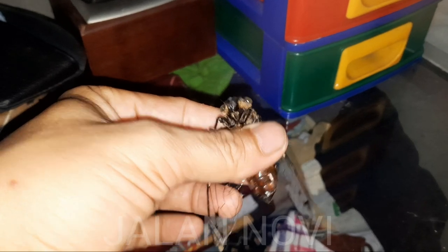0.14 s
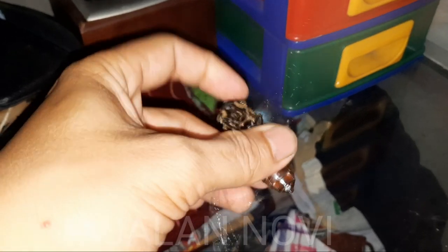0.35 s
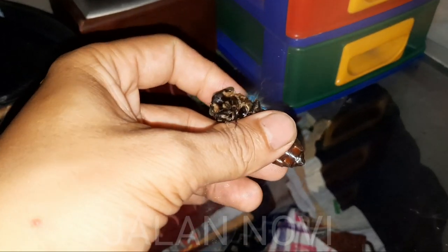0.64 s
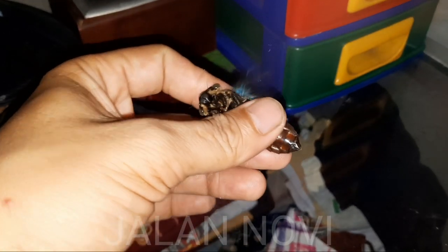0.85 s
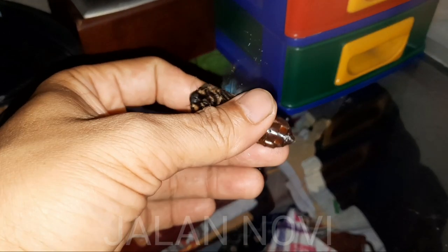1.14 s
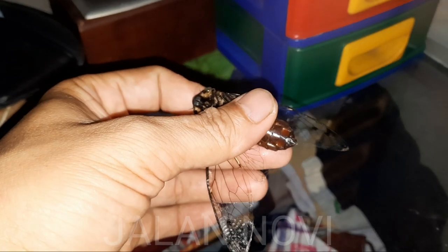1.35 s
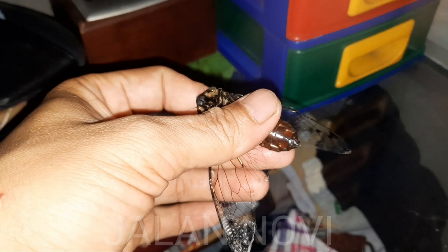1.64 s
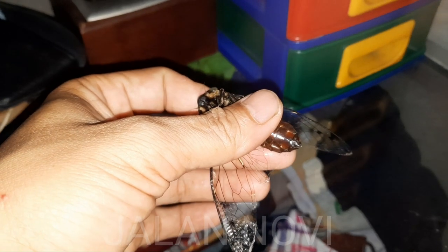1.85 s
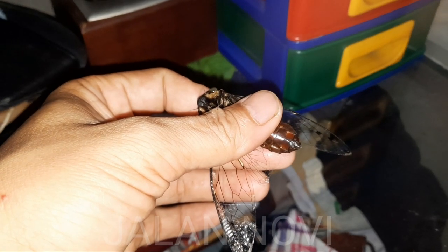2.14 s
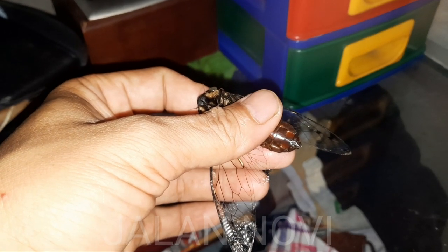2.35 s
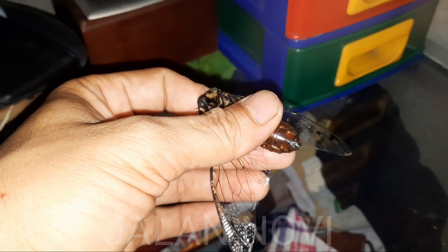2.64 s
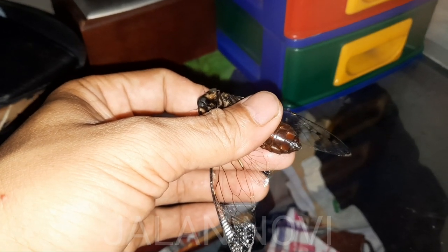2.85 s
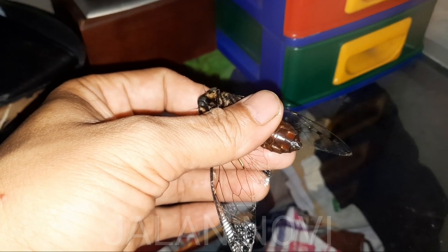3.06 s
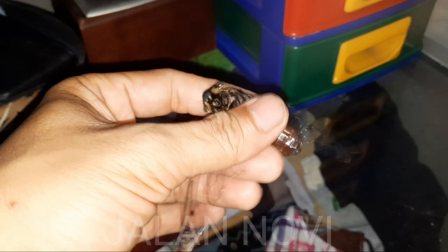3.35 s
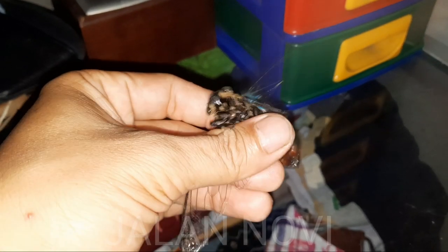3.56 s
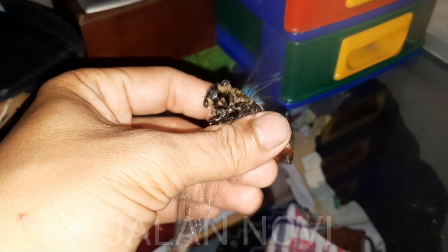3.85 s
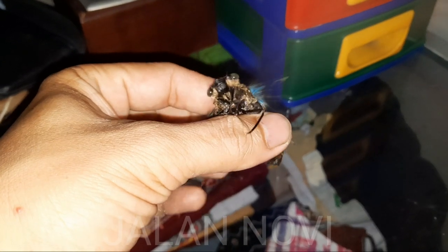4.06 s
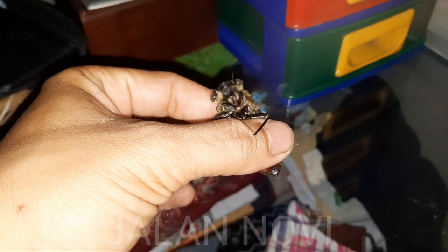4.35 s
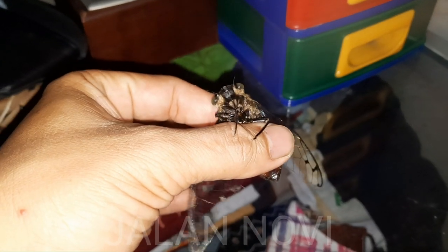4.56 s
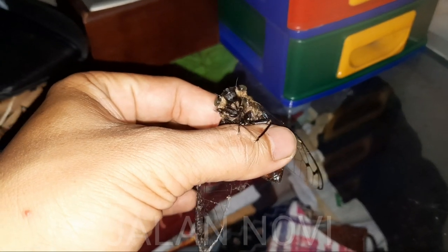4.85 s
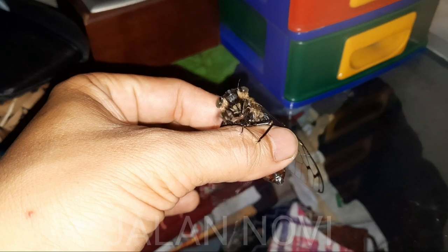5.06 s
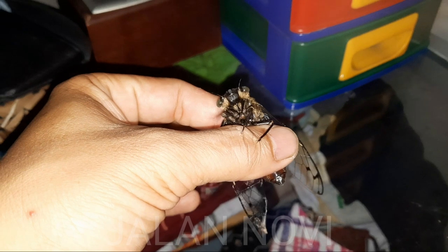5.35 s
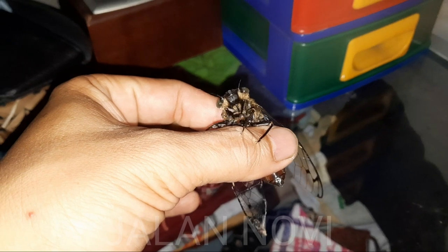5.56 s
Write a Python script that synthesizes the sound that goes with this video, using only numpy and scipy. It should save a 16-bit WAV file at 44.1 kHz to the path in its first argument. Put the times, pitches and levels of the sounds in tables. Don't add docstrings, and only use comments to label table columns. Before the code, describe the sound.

Very close, bright insect buzzing, a coarse rapid ratchet of about a hundred strokes a second, starts and stops abruptly in a small quiet room. One long burst and five quick ones precede a pause holding a short room tail, faint hum and distant insects. A loud second run follows with fluttering wings, dull finger taps and hand rumble, closing on two short-gapped bursts.

```python
import sys
import numpy as np
from scipy import signal
from scipy.fft import rfft, irfft, next_fast_len
from scipy.io import wavfile
from scipy.ndimage import uniform_filter1d

SR = 44100
rng = np.random.default_rng(int(sys.argv[2]) if len(sys.argv) > 2 else 0)


def file_out(sig):
    cols = np.atleast_2d(sig).T
    lim = np.clip(cols, -1, 1)
    pcm = np.round(lim * 32767).astype(np.int16)
    wavfile.write(sys.argv[1], SR, pcm)


def magnitude_from_level(level_db):
    exponent = np.asarray(level_db, float) / 20
    return 10 ** exponent


N = 250929

# start t/s, stop t/s, level at start/dB, level at stop/dB
BURSTS = [
    (0, 1.319, -13, -16.5),
    (1.339, 1.493, -15, -15),
    (1.517, 1.678, -14.5, -15.5),
    (1.713, 1.816, -15, -13.5),
    (1.831, 1.924, -16, -13),
    (2.066, 2.257, -15.5, -13.5),
    (3.308, 4.517, -10, -16),
    (4.546, 4.765, -15, -15.5),
    (4.929, 5.531, -13.5, -13.5),
    (5.562, 5.74, -13, -13.5),
]
# t/s, strokes per s
STROKES = [(0, 107.3), (.45, 108), (1.2, 107.2), (1.45, 108), (1.75, 109), (2.2, 109.8), (3.32, 108.8),
           (3.62, 107.8), (4.15, 109.4), (4.5, 109.2), (4.68, 111.5), (5.06, 111.4), (5.5, 110.2),
           (5.69, 111)]
# place in the stroke (0-1), strength/dB
RIBS = [(.02, 0), (.265, -1), (.52, -2), (.77, -1.5)]
# t/s, length of the turn/s
TURNS = [
    (.3, 0.057),
    (0.519, 0.2),
    (2.8, .1),
    (4.082, 0.24),
    (4.85, .1),
]
# t/s, depth/dB, half length/s
FALTERS = [
    (0.082, 9.5, 0.0089),
    (0.355, 4.5, 0.12),
    (4.344, 10.5, 0.015),
]
START_DB, START_S = 12, 0.0038
SWELL_DB, SWELL_S, REST_POWER = 14.5, 0.032, 0.55
STOP_DB, STOP_S = 3, 0.0098
PICK_UP, PICK_UP_S = .07, .035
TIRE, TIRE_S = .045, .025
PAIRED = .7
WEAK_RIB_DB = 7

# f/Hz, width/Hz, level/dB
BELLY_LOW = [(1720, 160, 3), (2150, 140, 3), (2540, 130, 5), (3130, 150, 3), (4250, 200, 3), (9400, 300, 3)]
# f/Hz, width/Hz, level/dB
BELLY_UP = [(1800, 160, 3), (2150, 140, 3), (2780, 110, 6), (3210, 110, 6), (4610, 130, 5), (6080, 200, 3)]
# f/Hz, width/Hz
FINGERS = [(432, 90), (600, 250), (865, 120), (1088, 90)]
FINGERS_DB = [(-6.5, -1.5, -13.5, 0), (-6.5, 11.5, -9, -5), (-2, -4, -4.5, -1), (-0.5, 8, -9, 1.5),
              (-3.5, -4.5, -3.5, -7.5), (1, -7.5, -1, -2.5)]
# f/Hz, level/dB
BASS = [
    [(210, -39), (410, -22.5), (640, -23.5), (860, -16)],
    [(210, -26.5), (410, -25), (620, -29), (830, -15.5)],
]
# f/Hz, level/dB
PINCHED = [
    [(1000, -21.5), (1310, -7.5), (1520, -6), (2140, 5), (4340, -5), (6820, -6.5), (8610, -8), (15300, -11)],
    [(1520, -14.5), (1860, 8), (2270, -15.5), (3170, 2.5), (4820, -7.5), (5510, 5), (9230, -12.5),
     (15300, -10.5)],
]
TILTED = [
    [(1100, -2.5), (1520, -3.5), (2270, -0.5), (3860, -5), (4690, -3), (6270, -5.5), (12200, 3),
     (15300, -17)],
    [(1170, 2), (1720, -11), (3790, 0), (4890, 0), (5440, 7.5), (5930, -2.5), (14330, -11.5), (15300, 0.5)],
]
CUPPED = [
    [(1030, -24.5), (1790, 3.5), (2760, -4.5), (8130, -9.5), (9440, -3.5), (10680, -10.5), (11780, -2.5),
     (15300, -19)],
    [(1030, -8), (1720, -4.5), (2270, -9.5), (3930, -2.5), (4800, -11.5), (5440, 0.5), (8500, -15),
     (15300, -7.5)],
]
RAISED = [
    [(1170, -15.5), (1720, 12), (2200, 13.5), (2480, 3.5), (3790, 6), (4960, -3.5), (5990, 3.5),
     (15300, -6)],
    [(1930, 7), (2960, 1.5), (3240, 14.5), (4000, -5.5), (5650, 11.5), (7370, -4), (9300, -3),
     (15300, -5.5)],
]
SHIFTED = [
    [(1100, -11.5), (1790, -2.5), (3170, -8.5), (3720, -3.5), (4820, -7.5), (7100, -16), (10750, -9.5),
     (15300, -19.5)],
    [(1310, -6.5), (1520, -36), (1790, 0), (2340, -17), (3240, -2.5), (4820, -7.5), (5440, -1),
     (15300, -16.5)],
]
UPRIGHT = [
    [(1100, -19.5), (1790, 1.5), (3500, -6.5), (4410, 0.5), (4890, -28.5), (5790, -1.5), (8680, -9.5),
     (15300, -10.5)],
    [(1100, -17.5), (1790, -2.5), (2410, -10.5), (3240, 0), (4820, -4.5), (5440, 2), (13370, -15.5),
     (15300, -4)],
]

# f/Hz, t60/s
ROOM = [(300, .33), (1000, .38), (2000, .68), (5000, .58), (9000, .5), (15000, .34)]
# f/Hz, level per Hz/dB
AIR = [(240, -36), (400, -20), (495, -15), (542, -16.5), (994, -25), (1350, -21.5), (1850, -34), (2360, 2),
       (2870, -36), (3950, -31.5), (5030, -18), (5680, -37), (8560, -28), (10400, -31.5), (15000, -47.5)]
AIR_DB = -64
# f/Hz, level/dB
HUM = [(51, -66.5), (152, -70.5), (253, -72.5)]
# t/s, level/dB
HANDLING = [(0, -48.5), (1.6, -48), (2.3, -62), (3.28, -71), (3.36, -50.5), (3.9, -44.5), (4.4, -56),
            (4.6, -62), (5, -64.5), (5.69, -59.5)]
# f/Hz, level per Hz/dB
RUMBLE = [(15, -42.5), (25, 1), (48, -3.5), (75, 0.5), (156, 6.5), (232, -7.5), (310, 1.5), (400, -3.5),
          (520, -41.5), (880, -120)]
RUMBLE_APART = .55

# t/s, beats per s, level/dB
FLUTTER = [
    [(0.29, 36.3, -36.5), (0.47, 36.4, -33.5), (0.576, 33.8, -37.5), (0.816, 33.9, -41.5),
     (0.9, 35.2, -39.5), (1.25, 35.2, -37)],
    [(3.97, 36.0, -40), (4.266, 36.9, -36.5), (4.344, 37.2, -42), (4.408, 33, -36), (4.48, 37.2, -48)],
]
# t/s, knock level/dB
SLAPS = [(3.493, -37.5), (3.536, -41), (3.58, -40), (3.628, -41), (3.672, -43), (3.715, -45), (3.754, -42),
         (3.797, -41.5), (3.839, -48.5), (3.88, -48), (3.919, -50)]
# f/Hz, level per Hz/dB
WING = [(24, -43.5), (40, -12.5), (59, -0.5), (97, -4.5), (140, -0.5), (222, -14.5), (319, -1.5),
        (392, -13), (420, -13), (550, -23), (920, -120)]
TICK_GAIN = 14
PUFF_DB = -3.5

CUTOFF_HZ = 15520


def at_hz(points, hz):
    table = np.array(points)
    return np.interp(np.log(hz + 1), np.log(table[:, 0]), table[:, 1])


def rms_one(x):
    return x / np.sqrt(np.mean(x ** 2) + 1e-20)


def response(spectrum, size, rings=()):
    hz = np.arange(size // 2 + 1) * SR / size
    db = at_hz(spectrum, hz)
    db = db + sum(top_db / (1 + (2 * (hz - at) / width) ** 2) for at, width, top_db in rings)
    fall = 3 * np.log(np.clip(hz / spectrum[0][0], .02, 1))
    cepstrum = irfft(np.log(magnitude_from_level(db)) + fall)
    cepstrum[1:size // 2] *= 2
    cepstrum[size // 2 + 1:] = 0
    return irfft(np.exp(rfft(cepstrum)))


def band_shares(count, low_hz, high_hz, size):
    hz = np.clip(np.arange(size // 2 + 1) * SR / size, low_hz, high_hz)
    place = np.log(hz / low_hz) / np.log(high_hz / low_hz)
    return [np.clip(1 - abs(place * (count - 1) - k), 0, 1) for k in range(count)]


def level(tables, column):
    t, gain = np.arange(N) / SR, np.zeros(N)
    for rows in map(np.array, tables):
        lasting = (t >= rows[0, 0]) * (t <= rows[-1, 0])
        gain += magnitude_from_level(np.interp(t, rows[:, 0], rows[:, column])) * lasting
    return gain


def coloured(spectrum, apart):
    mid, left, right = rng.standard_normal((3, N))
    white = [mid + apart * left, mid + apart * right]
    shape = response(spectrum, size=8192)[None, :4096]
    return rms_one(signal.oaconvolve(white, shape, axes=1)[:, :N])


def muscle():
    t, short = np.arange(N) / SR, np.zeros(N)
    for start, stop, *_ in BURSTS:
        inside = (t >= start) * (t <= stop)
        slow_start = PICK_UP * (start > 0) * np.exp(-abs(t - start) / PICK_UP_S)
        tired_end = TIRE * np.exp(-abs(stop - t) / TIRE_S)
        short += inside * (slow_start + tired_end)
    points = N // 900 + 2
    tremble = np.interp(np.arange(N) / 900, np.arange(points), rng.standard_normal(points))
    pace = np.interp(t, *np.transpose(STROKES)) * (1 - short + .008 * tremble)
    return np.cumsum(pace) / SR


def effort_of_bursts():
    t, gain, rested_since = np.arange(N) / SR, np.zeros(N), 0
    falter_db = sum(db * np.clip(1 - abs(t - s) / half, 0, 1) for s, db, half in FALTERS)
    for start, stop, start_db, stop_db in BURSTS:
        since = np.clip(t - start, 0, None)
        left = np.clip(stop - t, 0, None)
        rest = max(start - rested_since, 0)
        db = np.interp(t, [start, stop], [start_db, stop_db]) - falter_db
        db -= STOP_DB * np.exp(-left / STOP_S)
        db -= SWELL_DB * rest ** REST_POWER * np.exp(-since / SWELL_S)
        db -= START_DB * (rest > 0) * np.exp(-since / START_S)
        gain += magnitude_from_level(db) * (t >= start) * (t <= stop)
        rested_since = stop
    return gain


def drum(turns, jitter_s, spread_s, colour_db, wander_db, uneven_db, crackle_db, count):
    strokes = np.arange(int(turns[-1]) + 1)
    place, strength_db = np.transpose(RIBS)
    ribs = len(RIBS)
    buckle = np.interp(strokes[:, None] + place, turns, np.arange(N))
    buckle += jitter_s * SR * rng.standard_normal(buckle.shape)
    fade = np.exp(-1 / (.0028 * SR))
    size, out = next_fast_len(N), 0
    for k, share in enumerate(band_shares(count, 802, 12600, size=size)):
        bright = min(.3 + (k / 4) ** 2, 1)
        slide, wander = uniform_filter1d(rng.standard_normal((2, *buckle.shape)), size=36, axis=1) * 6
        habit = PAIRED * np.tile(rng.random(2), 2) + (1 - PAIRED) * rng.random(ribs)
        late = bright * spread_s * SR * (habit + .09 * slide)
        weak = (np.arange(4) + (k + 1) // 2) % 2
        db = strength_db - WEAK_RIB_DB * (bright - .3) * weak
        db = db + bright * (colour_db * rng.standard_normal(ribs) + wander_db * wander)
        snaps = np.zeros(N)
        moments = (buckle + late).clip(0, N - 1).astype(int)
        snaps[moments] = magnitude_from_level(db + uneven_db * rng.standard_normal(buckle.shape))
        crackle = signal.lfilter([np.sqrt(1 - fade ** 2)], [1, -fade], snaps) * rng.standard_normal(N)
        band_crackle_db = crackle_db + 16 * (k / count) ** 2 + 7 * (k < 1)
        out = out + share * rfft(rms_one(snaps + magnitude_from_level(band_crackle_db) * crackle), size)
    return irfft(out, size)[:N]


def cicada():
    effort = effort_of_bursts() * first_snap()
    turns = muscle()
    left, right = (effort * drum(turns, jitter_s=.000025, spread_s=.0019, colour_db=1.5, wander_db=1.2,
                                 uneven_db=1.0, crackle_db=-12, count=12) for side in range(2))
    around = magnitude_from_level(-8)
    ears = np.array([left + around * right, np.roll(right + around * left, 4)])
    t, out = np.arange(N) / SR, np.zeros((2, N))
    turned = [1] + [np.clip((t - s) / length + .5, 0, 1) for s, length in TURNS] + [0]
    for k, spectra in enumerate([PINCHED, TILTED, CUPPED, RAISED, SHIFTED, UPRIGHT]):
        belly = BELLY_LOW if k < 3 else BELLY_UP
        rings = belly + [(*part, db) for part, db in zip(FINGERS, FINGERS_DB[k])]
        body = np.array([response(low + high, size=2048, rings=rings)[:1024] for low, high in zip(BASS, spectra)])
        body = body / np.sqrt(np.sum(body ** 2))
        held = ears * (turned[k] - turned[k + 1])
        out += signal.oaconvolve(held, body, axes=1)[:, :N]
    return magnitude_from_level(6.0) * out


def room(x):
    size = 32768
    t, tail = np.arange(size) / SR, 0
    white = rfft(rng.standard_normal((2, size)))
    for k, share in enumerate(band_shares(9, 300, 15000, size=size)):
        t60 = at_hz(ROOM, 300 * 50 ** (k / 8))
        tail = tail + irfft(white * share) * magnitude_from_level(-60 * t / t60)
    tail *= np.clip((t - .003) / 0.0027, 0, 1)
    return signal.oaconvolve(x, tail / np.sqrt(np.sum(tail ** 2) / 2), axes=1)[:, :N]


def background():
    t = np.arange(N) / SR
    pulses = np.diff(np.floor(118 * t), prepend=0) * magnitude_from_level(rng.standard_normal(N))
    r, w = np.exp(-np.pi * 220 / SR), 2 * np.pi * 2310 / SR
    chorus = rms_one(signal.lfilter([1], [1, -2 * r * np.cos(w), r * r], pulses))
    hum = sum(magnitude_from_level(db) * np.sin(2 * np.pi * hz * t) for hz, db in HUM)
    rumble = level([HANDLING], column=1) * coloured(RUMBLE, apart=RUMBLE_APART)
    air = magnitude_from_level(AIR_DB) * coloured(AIR, apart=1.0)
    return air + magnitude_from_level(-85.0) * chorus + hum + rumble


def wings():
    beats = np.zeros(N)
    for rows in map(np.array, FLUTTER):
        n = np.arange(rows[0, 0] * SR, rows[-1, 0] * SR).astype(int)
        turns = 0.14 + np.cumsum(np.interp(n / SR, rows[:, 0], rows[:, 1])) / SR
        beats[n[1:][np.diff(np.floor(turns)) > 0]] = 1
    beats *= magnitude_from_level(0.51 * rng.standard_normal(N))
    rustle = magnitude_from_level(-40.0) * (rng.standard_normal(N) + 1.5 * rng.standard_normal((2, N)))
    steep = WING + [(700, -55.5), (2000, -76)]
    gain = level(FLUTTER, column=2)
    puffs = signal.oaconvolve(beats + rustle, response(steep, size=8192)[None, :4096], axes=1)[:, :N]
    puffs *= gain / np.sqrt(np.mean(puffs[:, gain > 0] ** 2))
    ticks = signal.lfilter([1], [1, -.97], beats * gain) * rng.standard_normal((2, N))
    treble = signal.butter(2, [6000, 14000], "band", fs=SR, output="sos")
    ticks = TICK_GAIN * signal.sosfilt(treble, ticks)
    t = np.arange(2000) / SR
    knock = np.sin(2 * np.pi * 300 * t) * t / 0.0018 * np.exp(-t / 0.0029)
    push = np.sin(2 * np.pi * 110 * t) * t / .004 * np.exp(-t / 0.0037)
    for s, knock_db in SLAPS:
        thud = magnitude_from_level(knock_db + 15.5) * knock + magnitude_from_level(knock_db + PUFF_DB + 13.5) * push
        start = round((s + 0.0018) * SR)
        puffs[:, start:start + len(t)] += thud
    ear_db = np.array([[1.], [-1.]])
    return puffs * magnitude_from_level(ear_db) + ticks


def first_snap():
    t, gain = np.arange(N) / SR, np.ones(N)
    for start, *_ in BURSTS[1:]:
        since = t - start - .004
        gain *= 1 + (since > 0) * np.exp(-np.abs(since) / 0.0018)
    return gain


def scene():
    near = cicada() + wings()
    return near + magnitude_from_level(-19) * room(near) + background()


def low_pass(x):
    return signal.sosfilt(signal.butter(12, 16610, fs=SR, output="sos"), x)


def record(dry):
    top_cut = signal.cheby1(14, .5, CUTOFF_HZ, fs=SR, output="sos")
    x = signal.sosfilt(top_cut, dry)
    return low_pass(np.clip(x, -1, 1))


dry = scene()
out = record(dry)
file_out(out)
```